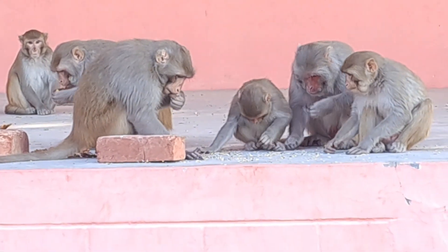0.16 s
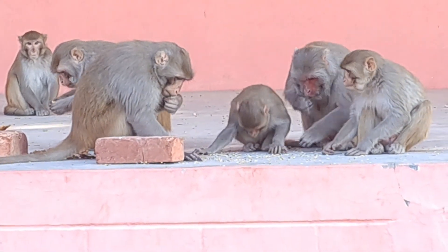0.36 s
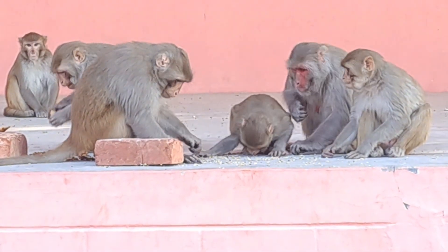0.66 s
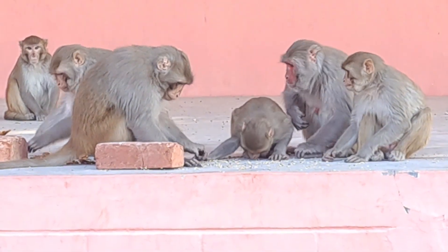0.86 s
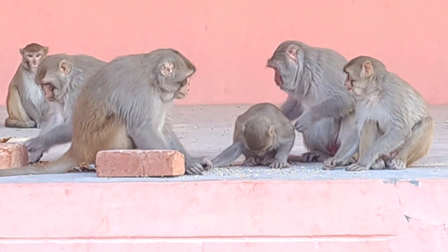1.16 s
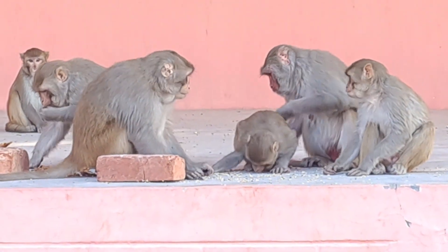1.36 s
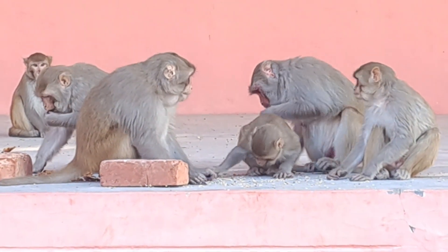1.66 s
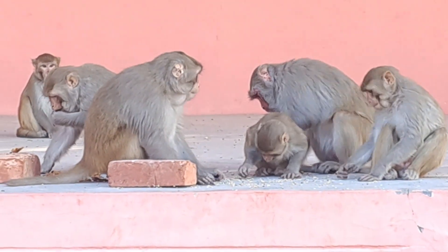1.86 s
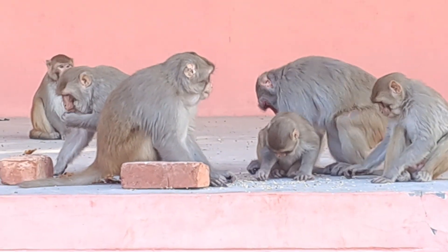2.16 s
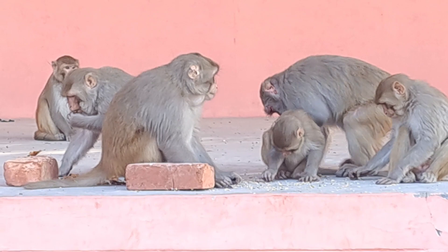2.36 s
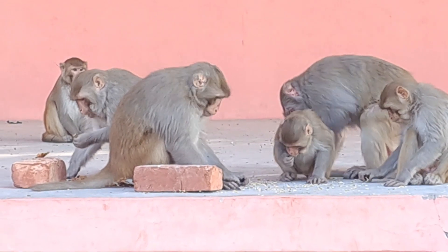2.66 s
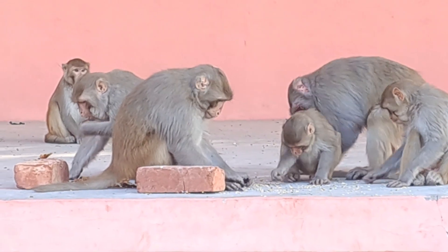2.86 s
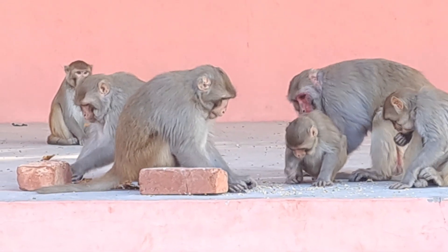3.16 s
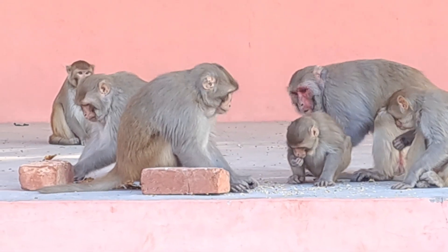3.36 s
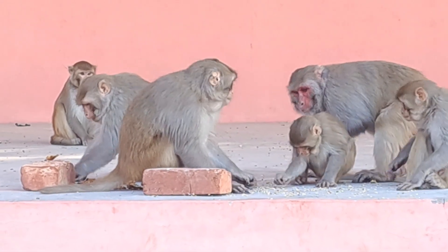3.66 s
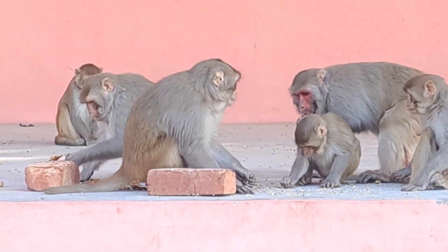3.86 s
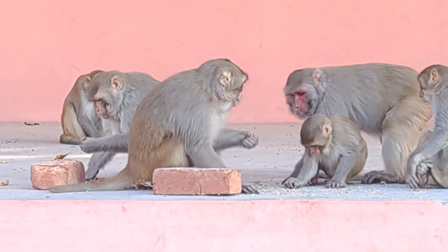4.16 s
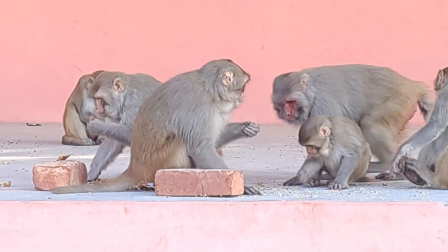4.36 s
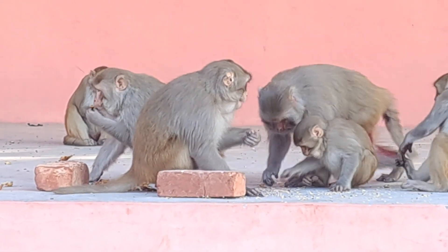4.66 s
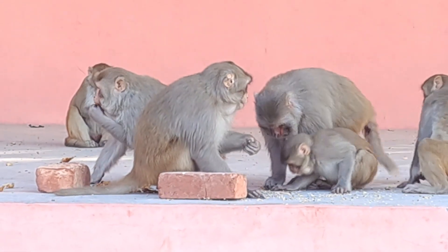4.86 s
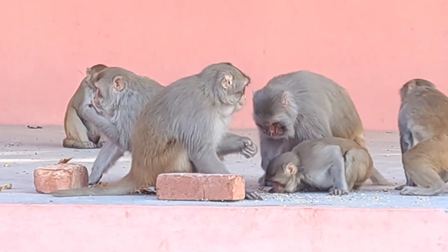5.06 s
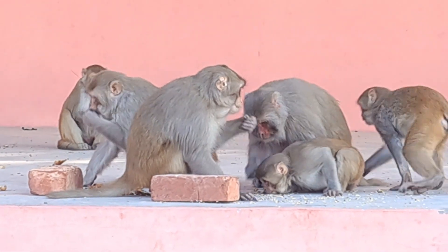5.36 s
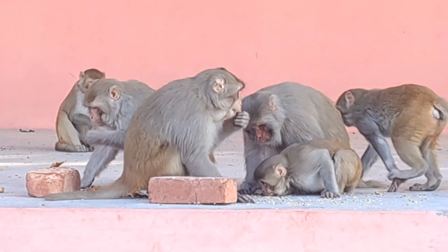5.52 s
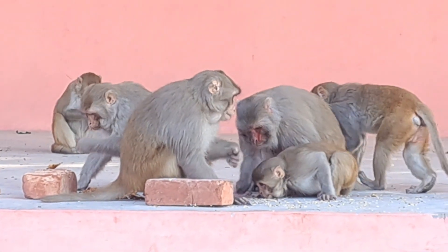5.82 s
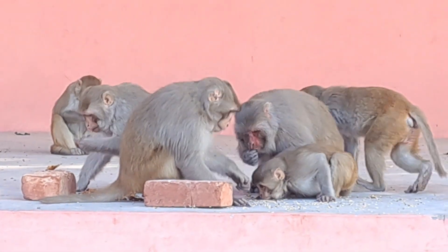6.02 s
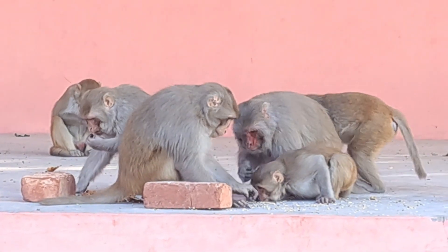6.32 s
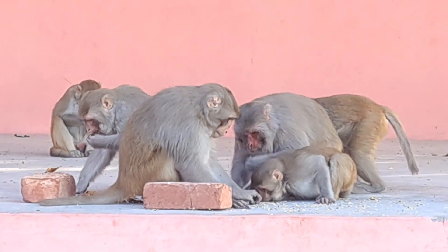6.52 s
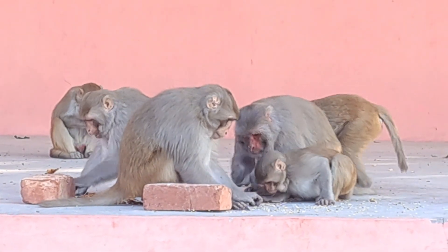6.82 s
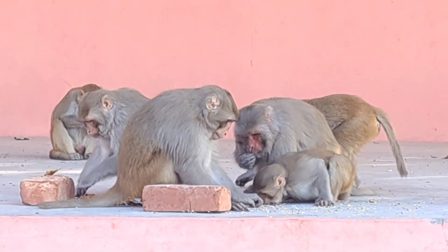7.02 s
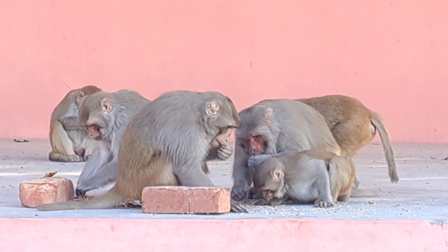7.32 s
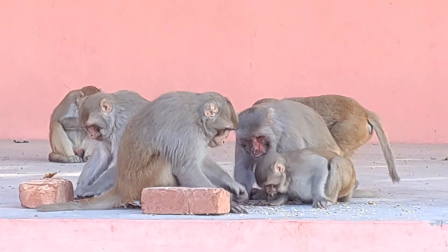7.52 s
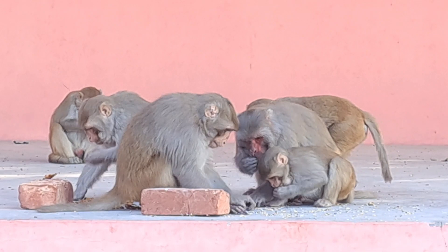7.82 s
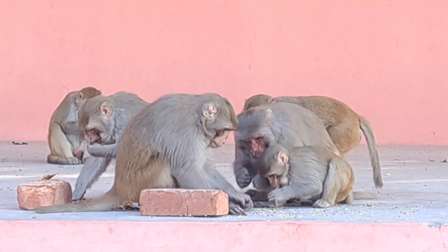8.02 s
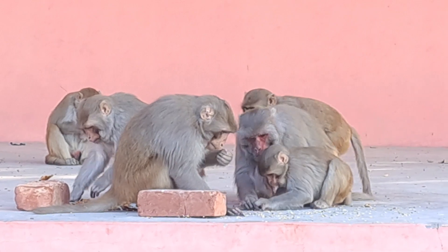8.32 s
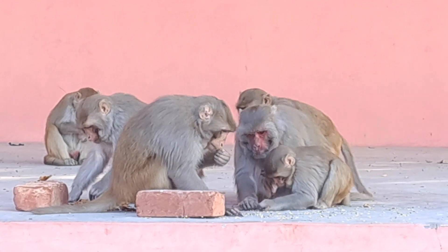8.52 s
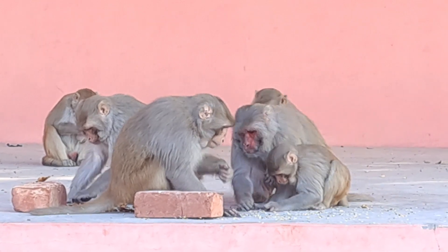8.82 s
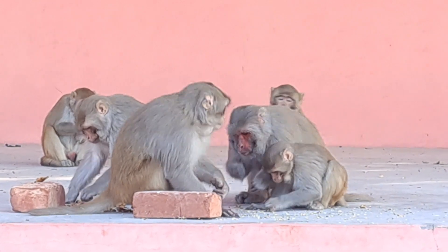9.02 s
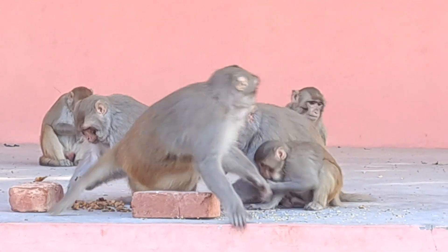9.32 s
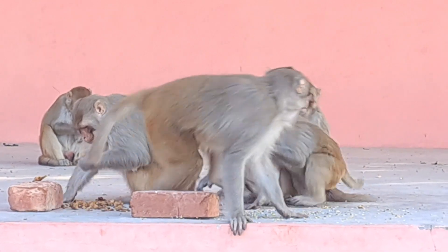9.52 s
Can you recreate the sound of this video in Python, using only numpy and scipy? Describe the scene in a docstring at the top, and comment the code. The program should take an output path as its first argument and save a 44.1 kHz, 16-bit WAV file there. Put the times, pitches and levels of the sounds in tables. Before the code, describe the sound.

Monkeys eating on a hard terrace in a reverberant walled yard, heard in stereo from a moderate distance. Thin chirps, a brief coo, dry taps and barely audible scuffs and squeaks sit over soft rumble. A few weak shrill cries come midway, then a calmer gap, then a steady burst of bright, open-mouthed screams that dominates the last part and is cut off by the end.

```python
"""A run of shrill macaque screams: harmonics and rasp through a wide open mouth, on a terrace in a walled yard.
Before and among them one monkey coos, others squeak and small birds chirp, all as gliding tones.
Hands and food tick, knock and scuff on the stone: shaped noise bursts and damped modes.
Drifting low tones throb like a far engine under noise for the outdoor rumble and hush.
The walls throw calls and handling back with a long ring of decaying noise."""
import sys
import numpy as np
from scipy import signal
from scipy.fft import rfft, irfft, next_fast_len
from scipy.io import wavfile
from scipy.ndimage import map_coordinates

SR = 44100
rng = np.random.default_rng(int(sys.argv[2]) if len(sys.argv) > 2 else 0)


def log_audio(samples):
    """Write samples as a 16-bit WAV file to the path given in sys.argv[1]."""
    # one column per channel
    frames = np.atleast_2d(samples).T
    # limit to full scale, then quantise
    limited = np.clip(frames, -1, 1)
    pcm = np.round(limited * 32767).astype(np.int16)
    wavfile.write(sys.argv[1], SR, pcm)


N = 426878

# Levels in the tables are relative; each layer adds its own gain.
# far engine tones: (frequency [Hz], level [dB])
ENGINE_TONES = [(36.5, -14.5), (47, -12), (55, -9.5), (69, 1), (80.5, -14), (92, -10), (108, -19),
                (138, -30), (180, -19.5), (364, -35)]
# how loudly the engine carries: (time [s], level [dB])
ENGINE_LEVEL = [(0.0, -42.5), (1.0, -43.5), (2.75, -42.5), (3.1, -41), (3.95, -38.5), (4.6, -43.5),
                (5.0, -40), (6.0, -37.2), (6.5, -38.5), (7.2, -38.5), (9.05, -41), (9.4, -45)]
# outdoor background: (time [s], rumble level [dB], hush level [dB])
AIR_LEVELS = [(0.0, -47.5, -56.5), (0.7, -49.5, -56.5), (2.4, -52, -58), (3.2, -47.5, -57.5),
              (4.55, -51.5, -58), (5.2, -47.5, -57.0), (7.7, -49, -58.1), (8.7, -47.6, -54),
              (9.68, -44, -55)]
# rumble spectrum: (frequency [Hz], density [dB per Hz])
RUMBLE_SPECTRUM = [(13, -51), (22, -27), (32, -26), (51, -3), (69, 2), (97, -9), (184, -17), (320, -29),
                   (358, -23.5), (420, -45.5), (550, -39), (920, -120)]
# hush spectrum: (frequency [Hz], density [dB per Hz])
HUSH_SPECTRUM = [(190, -12), (330, -2.5), (450, -6), (680, -4.5), (950, -4), (2100, -11), (2760, -24),
                 (3600, -27.5), (5400, -29), (7000, -29.5), (8500, -45), (10500, -39), (12000, -35),
                 (15500, -39.5)]
# left-right likeness of the background: (frequency [Hz], correlation [-1 to 1])
STEREO_LIKENESS = [(60, 0.73), (130, 0.98), (290, 0.82), (640, 0.29), (1410, -0.31), (3100, 0.29),
                   (6820, -0.023), (15000, -0.03)]
# reverberation of the yard: (frequency [Hz], t60 [s])
YARD_T60 = [(500, 0.48), (2000, 0.91), (3800, 1.22), (6000, 1.16), (10000, 0.79), (15000, 0.23)]
# hands and feet brushing the stone: (time [s], length [s], centre [Hz], level [dB])
SCUFFS = [(0.109, 0.093, 5200, -69), (2.06, 0.17, 4870, -63), (2.269, 0.18, 4100, -68),
          (2.93, .2, 5300, -74), (7.116, 0.063, 217, -42), (7.201, 0.16, 225, -50.5),
          (7.446, 0.064, 5900, -69.5)]
# bird chirps: (time [s], length [s], start [Hz], middle [Hz], end [Hz], level [dB])
CHIRPS = [(0.175, 0.57, 3076, 3156, 3180, -64), (0.371, 0.042, 6400, 5370, 4320, -58.5),
          (.50, .058, 5400, 4630, 4480, -61), (0.566, 0.058, 5900, 5430, 5260, -59),
          (.73, 0.073, 3070, 3155, 3100, -56), (0.846, 0.059, 2724, 3103, 3250, -54),
          (0.903, .41, 3124, 3180, 3240, -69), (2.694, 0.055, 6140, 5400, 4130, -66),
          (2.817, 0.092, 5500, 4650, 5720, -65), (4.558, 0.027, 5940, 5170, 4400, -59),
          (4.677, 0.05, 5300, 4670, 5400, -61), (4.82, 0.021, 3600, 3570, 3260, -51),
          (4.869, 0.036, 2900, 3180, 3200, -47), (5.208, .04, 2850, 2700, 2450, -53),
          (5.294, .035, 2380, 2680, 3220, -50), (6.029, 0.027, 3133, 2920, 2900, -50.5),
          (6.164, 0.058, 2570, 2820, 3387, -50.5), (6.218, 0.036, 2750, 2500, 2530, -55),
          (6.53, .28, 3010, 3080, 3050, -72.5), (6.80, .1, 3825, 3800, 3900, -70),
          (7.238, .39, 3040, 3150, 3180, -57.5)]
# hands and food on the stone: (time [s], level [dB], knock colour [dB])
TAPS = [(0.275, -43, -10), (1.0267, -42, 8), (1.4928, -35.5, 8), (2.2767, -37, -3), (3.326, -33.5, 14),
        (3.5455, -35.5, -1), (4.285, -46, -22), (4.5133, -42, -25)]
# duller blows: (time [s], level [dB])
KNOCKS = [(2.336, -42), (3.327, -56), (8.032, -35.5)]
# modes of a blow: (frequency [Hz], width before limiting [Hz], level [dB])
KNOCK_MODES = [(830, 72, 0), (1150, 37, -3), (1560, 190, -1.5)]
# coo: (time [s], length [s], start [Hz], middle [Hz], end [Hz], level [dB])
COOS = [(0.527, .255, 670, 780, 652, -46)]
# throat response of the coo: (frequency [Hz], gain [dB])
COO_THROAT = [(750, 1), (1550, -6.5), (2300, -29), (3900, -20), (4600, -30), (5400, -20), (6200, -27),
              (9500, -38), (14000, -50)]
# monkey squeaks: (time [s], length [s], start [Hz], middle [Hz], end [Hz], level [dB],
#  second harmonic [dB], pitch roughness [fraction])
SQUEAKS = [(1.30, 0.069, 3580, 3475, 3270, -59.5, -26, 0.033),
           (1.34, 0.054, 5200, 5100, 4900, -66, -27, 0.038), (1.36, 0.13, 5310, 4330, 3870, -59, -30, .012),
           (1.70, 0.4, 7600, 7100, 7280, -70, -30, 0.028),
           (1.84, 0.33, 5200, 5220, 5140, -66.5, -30, 0.029),
           (3.32, 0.31, 6760, 6720, 6740, -72.5, -37, 0.0213),
           (3.33, 0.31, 4960, 5050, 5210, -67, -35, 0.016),
           (4.903, 0.034, 3080, 3240, 3300, -35.5, -22, 0.018),
           (5.325, 0.015, 2060, 2550, 3050, -48, -22, 0.03),
           (7.012, 0.052, 3250, 3300, 3280, -49.5, -9, 0.022),
           (7.075, 0.049, 3360, 3184, 2590, -52.5, -3.5, .012),
           (7.095, 0.0594, 4420, 4330, 4150, -47.5, -37, 0.027),
           (7.728, 0.15, 3433, 3380, 3230, -44.5, -10, 0.024),
           (7.842, 0.044, 2520, 2350, 1830, -52.5, 5, 0.015),
           (8.283, 0.028, 3400, 3140, 2840, -35.5, -21, 0.012),
           (9.24, .055, 6150, 5850, 4880, -33, -19, 0.023)]
# screams: (time [s], length [s], top pitch [Hz], held pitch [Hz], middle of the fall [s], mouth opens [s],
#  level [dB], direct treble slope [dB/octave], brightness [dB/octave], left-right bias [dB], rasp [dB])
SCREAMS = [(4.904, 0.13, 2610, 2004, 0.033, 0.017, -43.5, -8, -8.5, -6, -6),
           (5.314, 0.14, 2500, 1854, 0.031, 0.041, -44.5, -7, -8, -6, -6),
           (5.598, 0.11, 2502, 1808, 0.039, 0.057, -42.5, -9, -7.5, -6, -5),
           (7.065, .075, 2285, 2157, 0.034, 0.013, -52.5, -8, -6, 0, -5),
           (8.003, 0.14, 2385, 2005, 0.051, 0.04, -36.5, 0, -1, 2, -11),
           (8.276, 0.14, 2367, 1988, 0.045, 0.026, -34.5, -0.5, 0.5, -1, -11),
           (8.537, 0.13, 2390, 1780, 0.047, 0.03, -30.5, 1.5, 1.5, -3, -13),
           (8.812, .122, 2334, 1802, 0.046, 0.025, -29.5, 0.5, 1, -7, -14),
           (9.081, 0.12, 2188, 1687, 0.048, 0.014, -28.5, 3, -2, -5, -14.5),
           (9.333, 0.12, 2368, 1658, 0.046, 0.0074, -32, 1.5, -3, -0.5, -12),
           (9.604, 0.13, 2214, 1770, 0.038, 0.02, -27, -1, 0.5, -1, -13)]
# wide open mouth: (frequency [Hz], gain [dB])
MOUTH = [(1500, -25), (2200, -12.5), (2800, -12), (3500, -3), (4200, -1), (4700, -11.5), (5050, -7.5),
         (5450, -6), (6200, -17.5), (8000, -22.5), (11000, -22.5), (13000, -29), (15500, -35)]

BAND_LIMIT_HZ = 15700
ENGINE_GAIN_DB, THROB_DB, THROB_KNOTS_PER_S = 0.5, 1.7, 12
RUMBLE_GAIN_DB, HUSH_GAIN_DB = 4.5, 5
CHIRP_OVERTONE_DB, CHIRP_ROUGHNESS = -32, 0.02
CHIRP_WET_DB, SQUEAK_WET_DB = -1.5, 0.3
# yard answer to a scream of level -35.5 dB; fainter screams are farther off and wetter
SCREAM_WET_DB, WET_DB_PER_DB = -2.5, 0.1955
SCREAM_ATTACK_S, SCREAM_RELEASE_S, SCOOP_S = 0.0017, 0.0094, 0.007


def amp(db):
    """Decibels to gain."""
    return 10 ** (np.asarray(db) / 20)


def unit(x):
    """Scale to rms 1."""
    return x / np.sqrt(np.mean(x ** 2) + 1e-20)


def noise(size):
    """White noise."""
    return rng.standard_normal(size)


def times_s(length_s):
    """Sample times of a sound."""
    return np.arange(int(length_s * SR)) / SR


def along(points, hz):
    """Read (Hz, value) points on a log frequency axis."""
    points_hz, values = np.transpose(points)
    return np.interp(np.log(hz + 1), np.log(points_hz + 1), values)


def curves(rows):
    """One value per sample for each column after the time."""
    knots_s, *columns = np.transpose(rows)
    return [np.interp(np.arange(N) / SR, knots_s, column) for column in columns]


def wobble(knots_per_s, size):
    """Smooth random curve through random knots."""
    knots = noise(int(size * knots_per_s / SR) + 4)
    return map_coordinates(knots, [np.arange(size) * knots_per_s / SR])


def filtered(x, response):
    """Apply a zero-phase gain that is a function of frequency."""
    n = x.shape[-1]
    m = next_fast_len(n + 8192)
    return irfft(rfft(x, m) * response(np.fft.rfftfreq(m, 1 / SR)), m)[..., :n]


def add(track, start_s, sound):
    """Mix a sound into a track, cut at the track's end."""
    part = track[..., round(start_s * SR):][..., :sound.shape[-1]]
    part += sound[..., :part.shape[-1]]


def swell(t, rise_s, fall_s):
    """Smooth opening and closing, sine squared at both ends."""
    opening = np.sin(np.pi / 2 * np.clip(t / rise_s, 0, 1)) ** 2
    closing = np.sin(np.pi / 2 * np.clip((t[-1] - t) / fall_s, 0, 1)) ** 2
    return opening * closing


def phase_of(pitch_hz):
    """Integrate pitch to phase in radians."""
    return 2 * np.pi * np.cumsum(pitch_hz) / SR


def in_yard(x, wet_db, pan_db, shadow_db=0, early_db=5, early_s=0.0086, lag_s=0.00045):
    """Direct sound, earlier on the left, plus near walls and a diffuse tail as decaying stereo noise."""
    hz, t, z = signal.stft(noise((2, SR)), SR, nperseg=256)
    decay_db = -60 * t / along(YARD_T60, hz)[:, None] + early_db * np.exp(-t / early_s)
    onset = np.clip(t / 0.0029, 0, 1)
    tail = signal.istft(z * amp(decay_db) * onset, SR, nperseg=256)[1]
    out = amp(wet_db) * signal.fftconvolve(x[None], tail / np.linalg.norm(tail[0]), axes=1)
    # a caller that faces away loses the treble of the direct path only
    direct = filtered(x, lambda f: amp(shadow_db * np.log2(np.maximum(f / 2200, 1))))
    add(out[0], 0, amp(pan_db / 2) * direct)
    add(out[1], lag_s, amp(-pan_db / 2) * direct)
    return out * amp([[-0.7], [0.7]])  # everything leans right by 1.4 dB


def engine(unsteady_rad=0.3, waver_db=1.5, drift_rad=1.17):
    """Low tones beat together like a far engine; the strongest is steadiest, the weaker ones drift."""
    level_db, = curves(ENGINE_LEVEL)
    t = np.arange(N) / SR
    hum = np.zeros(N)
    for hz, tone_db in ENGINE_TONES:
        loose = np.clip(1 - amp(tone_db), 0, 1)  # the weaker the tone, the more it strays
        stray = unsteady_rad * wobble(7, N) + drift_rad * loose * wobble(3, N)
        phase = 2 * np.pi * hz * t + stray + rng.uniform(0, 2 * np.pi)
        hum += amp(tone_db + waver_db * loose * wobble(4.2, N)) * np.sin(phase)
    throb_db = THROB_DB * wobble(THROB_KNOTS_PER_S, N)
    return amp(level_db + ENGINE_GAIN_DB + throb_db) * unit(hum)


def rush(spectrum):
    """Stereo noise of rms 1; mid and side shares set the left-right likeness at each frequency."""
    def shares(hz):
        turn = np.arccos(np.clip(along(STEREO_LIKENESS, hz), -1, 1)) / 2
        return amp(along(spectrum, hz)) * np.array([np.cos(turn), np.sin(turn)])

    mid, side = filtered(noise((2, N)), shares)
    return unit(np.array([mid + side, mid - side]))


def air():
    """Distant rumble and broad open-air hush: shaped noise with slowly moving levels."""
    rumble_db, hush_db = curves(AIR_LEVELS)
    engine_gap = [(45, -3.5), (68, -9), (95, 2.5)]  # leaves room for the engine: (Hz, dB)
    rumble = unit(filtered(rush(RUMBLE_SPECTRUM), lambda hz: amp(along(engine_gap, hz))))
    rumble = amp(rumble_db + RUMBLE_GAIN_DB + 1.6 * wobble(7.2, N)) * rumble
    hush = amp(hush_db + HUSH_GAIN_DB + 0.17 * wobble(5.5, N)) * rush(HUSH_SPECTRUM)
    return rumble + hush


def scuffs(grain_db=3):
    """Grainy noise about an octave wide: low for a body shifting, high for a palm sweeping up food."""
    out = np.zeros((2, N))
    for start_s, length_s, centre_hz, db in SCUFFS:
        t = times_s(length_s)
        band = lambda hz: amp(-22 * np.log2((hz + 1) / centre_hz) ** 2)
        stroke = unit(filtered(noise(len(t)), band))
        stroke *= amp(db + grain_db * wobble(198, len(t))) * swell(t, length_s / 4, length_s / 2)
        add(out, start_s, in_yard(stroke, wet_db=-3.0, pan_db=-3.5))
    return out


def glide(length_s, start_hz, middle_hz, end_hz, roughness):
    """Times, pitch and phase of an unsteady parabola through three pitches."""
    t = times_s(length_s)
    arc = np.polyfit([0, 0.5, 1], [start_hz, middle_hz, end_hz], 2)
    pitch_hz = np.polyval(arc, t / length_s) * (1 + roughness * wobble(600, len(t)))
    return t, pitch_hz, phase_of(pitch_hz)


def whistles(rows, wet_db, flutter_db=3):
    """Gliding, roughened notes: a fundamental with second and third harmonics."""
    out = np.zeros((2, N))
    for start_s, length_s, start_hz, middle_hz, end_hz, db, overtone_db, roughness in rows:
        t, pitch_hz, phase = glide(length_s, start_hz, middle_hz, end_hz, roughness)
        second = amp(overtone_db) * np.sin(2 * phase)
        third = amp(overtone_db - 15) * (3 * pitch_hz < SR / 2) * np.sin(3 * phase)
        note = (np.sin(phase) + second + third) * swell(t, length_s / 4, length_s / 4)
        note *= amp(db + flutter_db * wobble(105, len(t)))
        add(out, start_s, in_yard(note, wet_db, pan_db=-3))
    return out


def birds():
    """Small birds: nearly pure gliding whistles."""
    rows = [(*row, CHIRP_OVERTONE_DB, CHIRP_ROUGHNESS) for row in CHIRPS]
    return whistles(rows, CHIRP_WET_DB)


def handling():
    """Hands and food on stone: decaying noise ticks and duller blows of damped modes."""
    out = np.zeros(N)
    t = np.arange(SR // 8) / SR
    for start_s, db, knock_db in TAPS:
        colour = [(200, -16), (1200, knock_db), (2300, knock_db + 2), (3300, -6),
                  (6500, -3.5), (8500, -27), (15000, -24)]  # (Hz, dB)
        tick = unit(filtered(noise(len(t)), lambda hz: amp(along(colour, hz))))
        decay_db = -60 * t / 0.033
        add(out, start_s, amp(db - 11 + decay_db) * swell(t, 0.0019, 0.01) * tick)
    for start_s, db in KNOCKS:
        for hz, width_hz, mode_db in KNOCK_MODES:
            decay = np.exp(-np.pi * np.clip(width_hz, 50, 200) * t)
            add(out, start_s, amp(db + mode_db) * decay * np.sin(2 * np.pi * hz * t))
    return in_yard(out, wet_db=-0.5, pan_db=-10.5)[:, :N]


def coo():
    """Soft arched contact call: a row of harmonics weighted by the throat."""
    out = np.zeros((2, N))
    for start_s, length_s, start_hz, middle_hz, end_hz, db in COOS:
        t, pitch_hz, phase = glide(length_s, start_hz, middle_hz, end_hz, roughness=0.012)
        bright = swell(t, 0.059, 0.12)  # overtones are full only at the call's height
        voice = np.zeros(len(t))
        for k in range(1, 15):
            opening = bright if k > 1 else 1
            voice += amp(along(COO_THROAT, k * pitch_hz)) * opening * np.sin(k * phase)
        voice *= amp(db + 1.7 * wobble(40, len(t))) * swell(t, 0.035, 0.062)
        add(out, start_s, in_yard(voice, wet_db=-9, pan_db=0))
    return out


def squeaks():
    """Thin monkey squeaks: gliding notes, pure or hoarse."""
    return whistles(SQUEAKS, SQUEAK_WET_DB)


def screams(fall_s=0.00898, sag_per_s=0.15, scoop=0.48, drop=0.149, jitter=0.00618,
            flutter_db=3, edge_rasp_db=7, shut_db=-12, push_db=2.0):
    """Pitch scoops up, slides to a held note and collapses; the folds rasp most as they start and stop."""
    out = np.zeros((2, N))
    for (start_s, length_s, top_hz, held_hz, fall_mid_s, opening_s,
         db, shadow_db, bright_db, pan_db, rasp_db) in SCREAMS:
        t = times_s(length_s)
        slide = 1 / (1 + np.exp((t - fall_mid_s) / fall_s))
        start, stop = np.exp(-t / SCOOP_S), np.exp((t - length_s) / 0.00845)
        pitch_hz = held_hz + (top_hz - held_hz) * slide
        pitch_hz *= (1 - sag_per_s * (t - 0.085)) * (1 - scoop * start) * (1 - drop * stop)
        # the pitch shakes more while it is high, the more so in a hoarse call
        shake = 1 + amp(rasp_db + 15) * slide + 3 * (start + stop)
        pitch_hz *= 1 + jitter * (wobble(916, len(t)) + wobble(126.6, len(t))) * shake
        phase = phase_of(pitch_hz)

        def mouth(hz):
            return amp(along(MOUTH, hz) + bright_db * np.log2(np.maximum(hz, 1500) / 4000))

        # overtones flash in the scoop, then come back only as the mouth opens
        shut = 1 / (1 + np.exp((t - opening_s) / 0.0066))
        flash = 0.65 * np.exp(-(t / 0.012) ** 2)
        tone = np.zeros(len(t))
        for k in range(1, 10):
            closed_db = shut_db * shut * (np.log2(min(k, 5)) - flash * (k > 1))
            overtone = amp(closed_db + flutter_db * wobble(171.3, len(t))) * (k * pitch_hz < SR / 2)
            tone += mouth(k * pitch_hz) * overtone * np.sin(k * phase)

        rasp = unit(filtered(noise(len(t)), lambda hz: mouth(hz) / (1 + (1500 / (hz + 1)) ** 6)))
        dull_rasp = filtered(rasp, lambda hz: 1 / (1 + (hz / 5000) ** 2))
        rasp = ((1 - shut) * rasp + shut * dull_rasp) * swell(t, 0.012, 0.008)
        # the push builds through the scoop and is hardest at the end of the fall
        effort_db = push_db * np.exp(-((t - fall_mid_s - 0.008) / 0.024) ** 2) - 7.9 * start
        effort = amp(effort_db) * swell(t, SCREAM_ATTACK_S, SCREAM_RELEASE_S)
        voice = effort * tone + amp(rasp_db + edge_rasp_db * (start + stop)) * rasp
        wet_db = SCREAM_WET_DB - WET_DB_PER_DB * (db + 35.5)
        add(out, start_s, in_yard(amp(db + 3.5) * voice, wet_db, pan_db, shadow_db))
    return out


def scene():
    """Monkeys, birds and handling over the outdoor background."""
    return engine() + air() + scuffs() + birds() + handling() + coo() + squeaks() + screams()


def record(dry):
    """Remove everything above the band limit."""
    return filtered(dry, lambda hz: hz < BAND_LIMIT_HZ)


dry = scene()
out = record(dry)
log_audio(out)
```